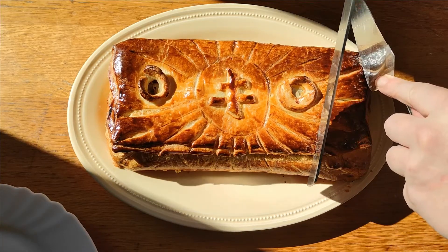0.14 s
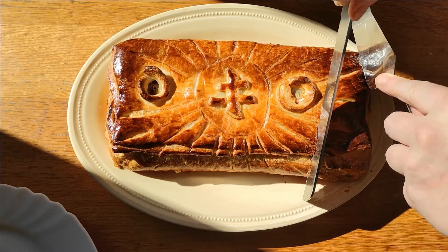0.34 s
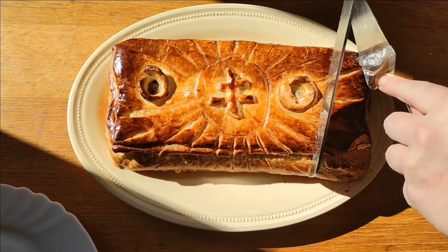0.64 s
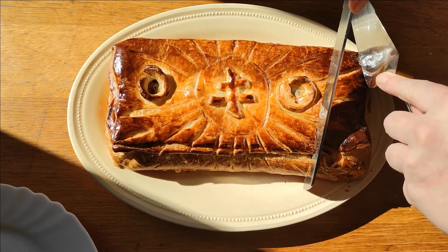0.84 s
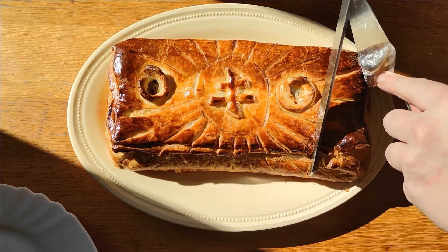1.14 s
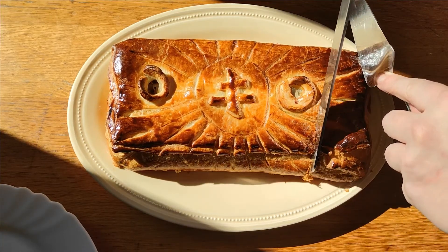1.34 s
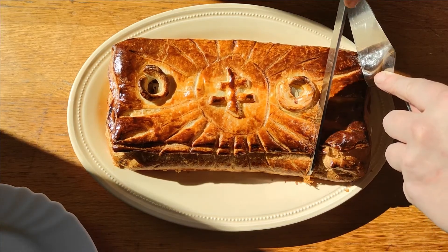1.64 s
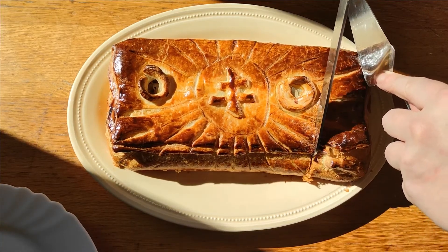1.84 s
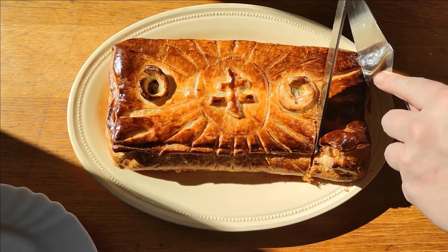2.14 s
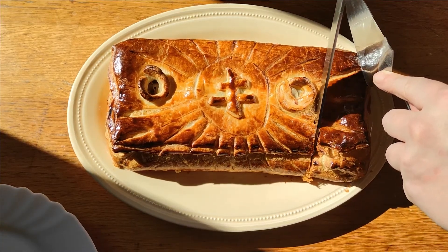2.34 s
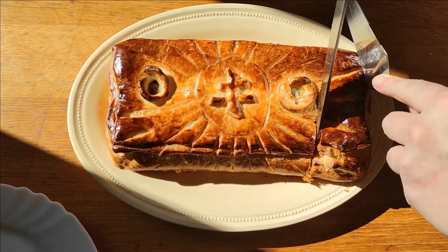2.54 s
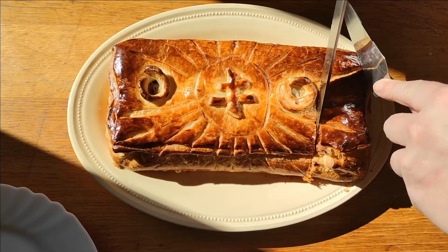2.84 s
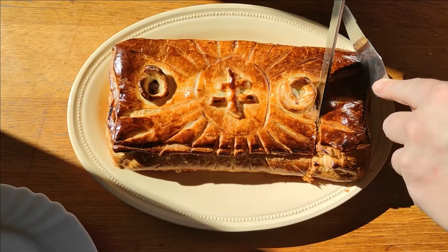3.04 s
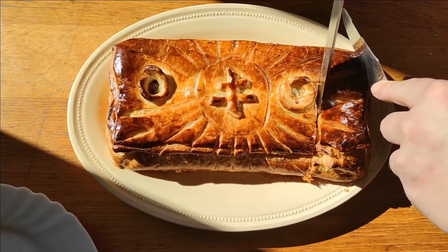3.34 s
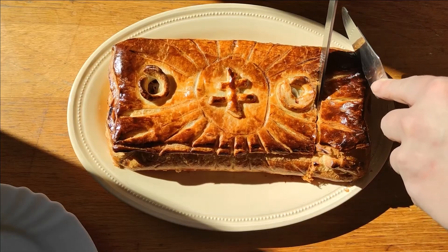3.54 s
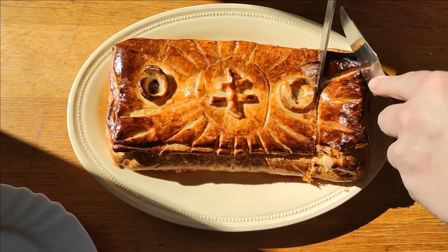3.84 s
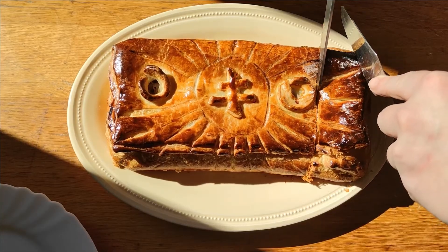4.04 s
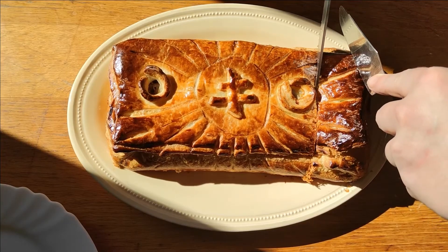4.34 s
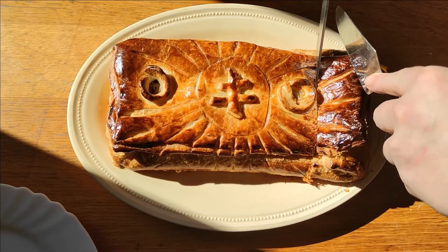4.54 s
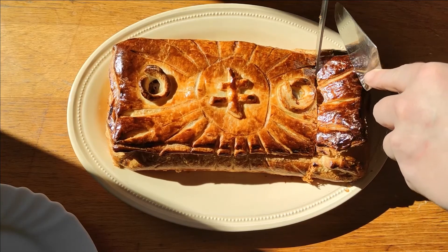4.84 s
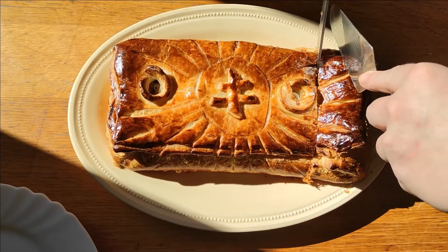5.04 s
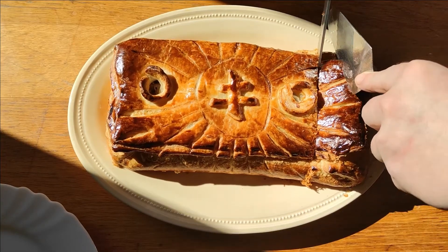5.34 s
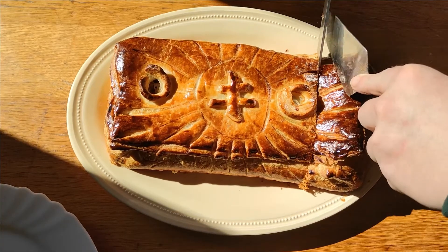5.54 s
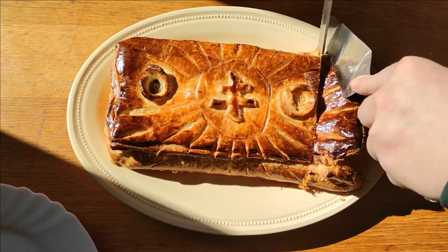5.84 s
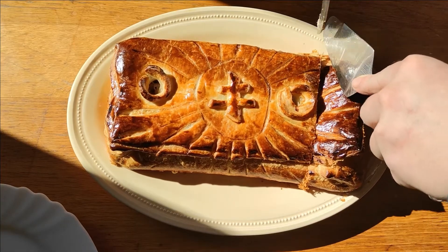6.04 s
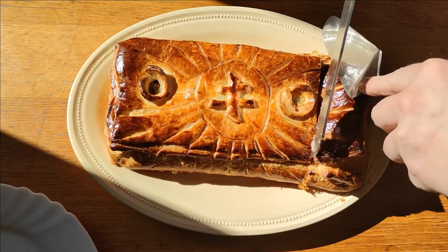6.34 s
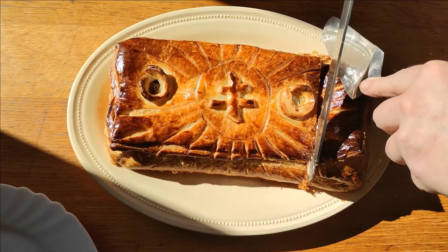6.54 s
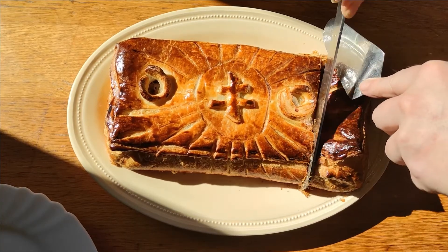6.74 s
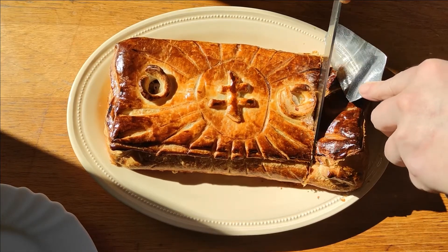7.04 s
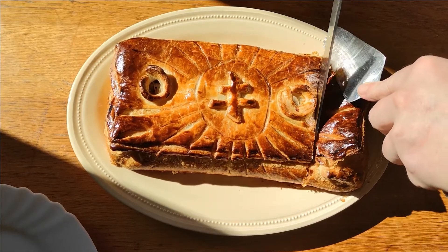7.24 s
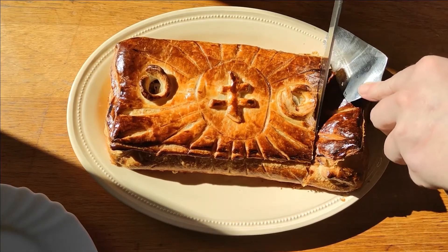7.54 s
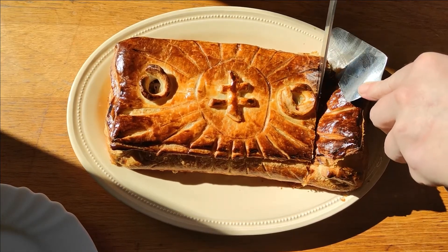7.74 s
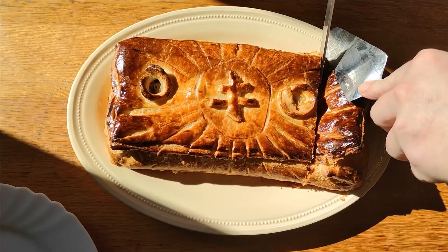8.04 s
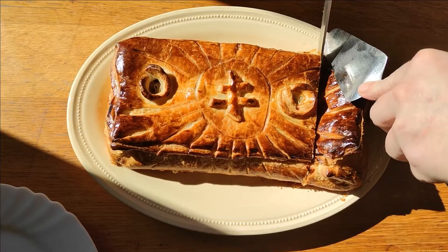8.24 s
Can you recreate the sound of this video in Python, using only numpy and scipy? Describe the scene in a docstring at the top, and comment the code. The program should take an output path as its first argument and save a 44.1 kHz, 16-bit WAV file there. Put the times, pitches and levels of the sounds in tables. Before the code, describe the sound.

Close, dry crackling of baked crust being cut stroke by stroke, flakes snapping, blade thudding on a ceramic plate, a metal server clinking once.

```python
"""Knife through crisp pastry

A knife saws through a crisp pastry on a ceramic platter, close by in a small kitchen.
The crust is shaped noise: each stroke swells to a crunchy bite, gives way and slides on; big flakes snap.
Dull bumps of the platter are short noise bursts; blade knocks are noise cracks plus fading platter tones.
A steel cake server clinks once against the knife (fading tones) and scrapes under the pastry (clumpy noise).
"""
import sys
import numpy as np
from scipy import signal
from scipy.fft import rfft, irfft, next_fast_len
from scipy.io import wavfile
from scipy.ndimage import uniform_filter1d

SR = 44100
rng = np.random.default_rng(int(sys.argv[2]) if len(sys.argv) > 2 else 0)


def waveform_to_disk(signal):
    """Save audio, clipped to [-1, 1], as 16-bit WAV at the path in sys.argv[1]."""
    frames = np.transpose(np.atleast_2d(signal))
    scaled = np.clip(frames, -1, 1) * 32767
    samples = np.round(scaled).astype(np.int16)
    wavfile.write(sys.argv[1], SR, samples)


N = 369822

# how alike the two microphones hear each pitch: [f/Hz, correlation]
LIKENESS = [(30, .35), (100, .8), (300, .92), (700, .85), (1300, .15), (2500, -.1), (5000, -.2),
            (14000, .1)]
# tone of the crackling crust: [f/Hz, relative level/dB]
CRISP_TONE = [(900, -15.5), (2000, -6.5), (3000, -1), (4500, 1), (5500, 0.5), (6800, 2.5), (7500, -1),
              (8400, -12), (10000, -10.5), (14000, -11)]
# tone of the tearing softer layers: [f/Hz, relative level/dB]
TEAR_TONE = [(300, -13.5), (600, -6.5), (1000, -1.5), (1700, -2), (2400, -3), (4000, -7.5), (8000, -39)]
# tone of the platter pushed on the table: [f/Hz, relative level/dB]
PUSH_TONE = [(30, -10), (80, -5.5), (160, -6), (232, -15), (268, 5), (300, -1), (365, -6), (412, -2),
             (520, -12), (800, -23), (1600, -39.5)]


def amp(db):
    """Turns decibels into a gain."""
    return 10 ** (np.asarray(db) / 20)


def unit(x):
    """Scales a sound to an average strength (rms) of one."""
    return x / np.sqrt(np.mean(x ** 2) + 1e-20)


def read(points, hz):
    """Reads a curve between its points, along a log-frequency axis."""
    f, value = np.transpose(points)
    return np.interp(np.log(hz + 1), np.log(f + 1), value)


def follow(rows, index):
    """Turns one dB column of a timed curve into a gain for every sample."""
    rows = np.array(rows)
    return amp(np.interp(np.arange(N) / SR, rows[:, 0], rows[:, index]))


def add(mix, s, sound):
    """Adds a sound of several channels into the mix at a time in seconds."""
    start = max(round(s * SR), 0)
    part = mix[:, start:][:, :sound.shape[1]]
    part += sound[:, :part.shape[1]]


def colour(pair, spectrum):
    """Gives two signals a spectrum, and makes them as alike as two close microphones hear them."""
    size = next_fast_len(pair.shape[1], True)
    hz = np.fft.rfftfreq(size, 1 / SR)
    z = rfft(pair, size)
    same = np.clip(read(LIKENESS, hz), -1, 1)
    mid = z[0] * np.sqrt(1 + same)
    side = z[1] * np.sqrt(1 - same)
    shaped = np.array([mid + side, mid - side]) * amp(read(spectrum, hz))
    return unit(irfft(shaped, size)[:, :pair.shape[1]])


def grains(per_s, spread_db, haze, clump_db):
    """Tiny uneven fractures over a finer haze, in clumps as the surfaces stick and slip."""
    size_db = spread_db * np.minimum(rng.exponential(1, N), 4)  # sizes have a ceiling
    size = amp(size_db) * (rng.random(N) < per_s / SR)
    burst = signal.lfilter([1], [1, -np.exp(-1 / 10)], size ** 2)  # power of each grain dies over 10 samples
    slow = uniform_filter1d(rng.standard_normal(N), size=450)
    slip = unit(uniform_filter1d(slow, size=120))
    strength = np.sqrt(burst / burst.mean() + haze ** 2)
    return strength * amp(clump_db * slip) * rng.standard_normal((2, N))


def bursts(rows, spectrum, decay_s, level_db):
    """Short breaks that do not ring: coloured noise that dies away."""
    out = np.zeros((2, N))
    t = np.arange(SR // 8) / SR
    for s, db in rows:
        noise = colour(rng.standard_normal((2, len(t))), spectrum)
        add(out, s, amp(db + level_db) * noise * np.exp(-t / decay_s))
    return out


def ring(hz, gain, t60, pan_db, t, scatter=0.77):
    """Fading tones (modes) of a struck body, each phase about a quarter turn from the one before."""
    # where the microphones hear differently, left and right are out of step
    apart = np.arccos(np.clip(read(LIKENESS, hz), -1, 1)) / 2
    phase = np.arange(len(hz)) * np.pi / 2 + scatter * rng.standard_normal(len(hz))
    phase = phase + np.array([-apart, apart])
    fade = amp(-60 * np.maximum(t, 0) / t60[:, None])
    waves = np.sin(2 * np.pi * hz[:, None] * t + phase[..., None]) * fade
    side_gain = gain * amp(np.array([pan_db, -pan_db]) / 2)
    return (waves * side_gain[..., None]).sum(1)


def air():
    """The still air of the room: a steady, faint noise."""
    # [f/Hz, relative level/dB]
    air_tone = [(12, -23), (20, 6.5), (223, -8.5), (263, -20.5), (409, -10.5), (470, -20.5), (693, -17.5),
                (1140, -22.5), (1930, -21), (5090, -23.5), (6720, -25.5), (9110, -34), (13800, -30),
                (15000, -46)]
    return amp(-54.5) * colour(rng.standard_normal((2, N)), air_tone)


def sawing():
    """Crackle, tear and push gains: a stroke swells to a bite, holds, falls; its slide stops at each turn."""
    # sawing strokes, each lasting until the next: [start t/s, time to bite t/s, crisp crust level/dB,
    # tearing of softer layers level/dB, sliding level/dB, lean on the platter level/dB]
    strokes = [(0, 0.034, -42, -46, -52, 0), (.205, 0.14, -36, -40.5, -44.5, 1.5),
               (.7, 0.13, -35, -37, -66, 2), (.97, 0.041, -50, -56, -50, 1.5),
               (1.12, 0.096, -36, -36, -74, 0), (1.38, 0.038, -54, -56, -55.5, -5),
               (1.527, 0.11, -36, -32.5, -68, 2), (1.931, 0.069, -43, -38.5, -62, 3),
               (2.289, 0.051, -47, -49, -59, -0.5), (2.49, 0.093, -53, -66, -60, -0.5),
               (2.68, 0.045, -49, -55, -54.5, 1), (2.815, 0.16, -55, -45, -53.5, -1.5),
               (3.034, 0.084, -42, -38, -55.5, 1), (3.413, 0.07, -33.5, -39, -46.5, -3),
               (3.771, 0.089, -31.5, -37.5, -63.5, -1), (4.182, 0.026, -30.5, -57, -53, -2),
               (4.525, .05, -44, -46, -51.5, 0.5), (4.854, 0.038, -44, -49.5, -53.5, 1),
               (5.185, 0.034, -43.5, -53, -51.5, 1.5), (5.375, 0.037, -36.5, -49, -59, -3.5),
               (5.5, 0.023, -45.5, -45.5, -61, 1), (5.698, 0.41, -55, -46, -56.5, 3),
               (6.07, .03, -58.5, -57.5, -81, -2.5), (6.425, 0.019, -54.5, -58, -75, -4),
               (6.516, 0.089, -47.5, -64, -51, -5), (6.875, 0.047, -50.5, -47, -72, 1.5),
               (7.12, 0.069, -50.5, -53.5, -56, 0), (7.29, 0.067, -53, -45, -58.5, 3),
               (7.57, 0.15, -41.5, -40, -64, 5.5), (7.97, 0.033, -40.5, -54, -58, -0.5),
               (8.18, 0.023, -52.5, -55, -57.5, 7.5)]
    swell_rise_db, hold_s = 19.5, 0.009  # growth up to the bite; then a hold before the crust gives way
    crisp_fall_db_per_s, tear_fall_db_per_s = 170.5, 159.5
    speed_power, slide_tear_db = 0.44, -2  # sliding follows blade speed; tearing in the slide
    push_power = 0.61  # drag on the platter grows more slowly than the crunch
    power = np.zeros((3, N))
    t = np.arange(SR) / SR
    ends = [row[0] for row in strokes[1:]] + [N / SR]
    for (start, bite_s, crisp_db, tear_db, slide_db, lean_db), end in zip(strokes, ends):
        swell_db = swell_rise_db * np.minimum(t / bite_s - 1, 0)
        after = np.maximum(t - bite_s - hold_s, 0)
        speed = np.abs(np.sin(np.pi * np.minimum(t / (end - start), 1)))
        slide = amp(slide_db) * speed ** speed_power
        crisp_bite = amp(crisp_db + swell_db - crisp_fall_db_per_s * after)
        tear_bite = amp(tear_db + swell_db - tear_fall_db_per_s * after)
        crisp = np.hypot(crisp_bite, slide)
        tear = np.hypot(tear_bite, amp(slide_tear_db) * slide)
        push = amp(lean_db) * np.hypot(crisp, tear) ** push_power
        add(power, start, np.array([crisp, tear, push]) ** 2)
    return np.sqrt(power)


def crust(crisp_db=-1.0, flakes_db=-9, tear_db=-4.0, push_db=-22.5, pan_db=-0.9):
    """Flakes crackle, the layers under them tear, and the drag of the blade rumbles in the platter."""
    crackling, tearing, pushing = sawing()
    flakes = amp(flakes_db) * unit(grains(per_s=53, spread_db=3, haze=0, clump_db=1.5))
    fine = unit(grains(per_s=1500, spread_db=0.0, haze=1.0, clump_db=2.5))
    crisp = amp(crisp_db) * crackling * colour(fine + flakes, CRISP_TONE)
    layers = grains(per_s=500, spread_db=2.0, haze=0.98, clump_db=3.5)
    tear = amp(tear_db) * tearing * colour(layers, TEAR_TONE)
    drag = grains(per_s=270, spread_db=0.5, haze=.7, clump_db=0.9)
    push = amp(push_db) * pushing * colour(drag, PUSH_TONE)
    return (crisp + tear) * amp([[pan_db], [-pan_db]]) + push


def snaps():
    """Large flakes snap: a sharp crack, a duller tear, and crumbs that crumble on briefly."""
    # [t/s, level before the part levels below/dB]
    flake_snaps = [(0.2106, -41), (0.7914, -19.5), (1.035, -27.5), (1.2128, -21), (1.6107, -21),
                   (1.9899, -18.5), (3.1278, -24.5), (3.8142, -19), (3.8319, -17), (3.86, -21.5),
                   (5.0266, -26.5), (5.0904, -29.5), (5.3026, -28.5), (5.4114, -23), (7.6343, -29),
                   (8.0037, -25), (8.2136, -31)]
    sharp = bursts(flake_snaps, CRISP_TONE, decay_s=0.0014, level_db=-8.5)
    dull = bursts(flake_snaps, TEAR_TONE, decay_s=.006, level_db=-17.5)
    crumbs = bursts(flake_snaps, CRISP_TONE, decay_s=.016, level_db=-13.0)
    return sharp + dull + crumbs


def bumps():
    """Soft bumps of the platter on the table: short, low noise bursts."""
    # [t/s, level before the offset below/dB]
    platter_bumps = [(.305, -25.5), (2.385, -36), (2.89, -25), (2.923, -44), (5.218, -23), (6.443, -36.5),
                     (7.212, -31)]
    return bursts(platter_bumps, PUSH_TONE, decay_s=0.03, level_db=-10.0)


def blow(hz, hardness_db, body_hz, rim_hz):
    """Strength of a knock in dB by frequency: harder is brighter, and the spot struck favours some modes."""
    # what every knock puts in: [f/Hz, relative level/dB]
    blow_tone = [(150, -11), (270, -4), (400, -3.5), (730, -4), (1290, -5), (1750, -2.5), (3000, -3),
                 (4200, -12), (6000, -17)]
    favour_db, favour_octaves = 7.5, 0.56  # boost and width around each favoured resonance
    favour = sum(np.exp(-(np.log2(hz / centre) / favour_octaves) ** 2 / 2) for centre in (body_hz, rim_hz))
    return read(blow_tone, hz) + hardness_db * np.log2(hz / 1000) + favour_db * favour


def knocks(contact_s=.0036, rise_s=0.0019, modes_db=-5.0, bite=1.47, bite_s=0.0023,
           crack_db=-18, crack_s=0.0036):
    """The blade breaks through and strikes the platter; where it lands decides which modes answer."""
    # the blade meets the platter: [t/s, strength level/dB, place from 0 (near rim) to 1 (far rim),
    # hardness/(dB per octave), favoured body resonance f/Hz, favoured rim resonance f/Hz]
    platter_knocks = [(0.38, -17, 0, -1.1, 360, 3050), (0.831, -17, 0.06, -3, 377, 4600),
                      (1.639, -16, 0.29, -0.7, 574, 2360), (2.022, -16, 0.36, 0.1, 690, 1970),
                      (3.907, -19.5, 0.95, 3.5, 390, 1360), (4.279, -21.5, 1, 2, 390, 1950),
                      (4.612, -19.5, 0.98, 2.6, 364, 1420), (4.939, -19.0, 0.93, 3.5, 365, 1820),
                      (5.245, -21, 0.83, 1.26, 687, 1095), (6.059, -16, 0.19, 3, 300, 2280),
                      (6.795, -27, 0, -3, 414, 4370), (7.396, -35, 0.32, 0.7, 260, 4090),
                      (7.723, -28.5, 0.41, 1.5, 450, 1270), (7.772, -36, 0.93, -1, 460, 1370),
                      (7.824, -40, 0.5, 3.5, 860, 1500), (8.272, -38.5, 0.62, -2, 430, 1760)]
    # tones of the laden platter on its wooden table: [f/Hz, relative level struck at near rim/dB,
    # relative level struck at far rim/dB, time to fall 60 dB t/s, left over right level/dB]
    platter = [(158, -16.5, -4.5, 0.054, -11.5), (268.5, -1.5, 3, 0.24, 0), (333.6, -3.5, 0.5, 0.15, 3),
               (418, -9, -6, 0.2, 6.5), (426, 0.5, -12, 0.033, -4), (520.7, -1, -9.5, 0.14, -6.5),
               (587, 1.5, 5, 0.024, -4.5), (698, 0, 1.5, 0.03, -1), (792, 3, -8, .05, -8),
               (1030, 0, -19.5, 0.027, 3), (1261, 2.5, -1.5, 0.032, -3.5), (1332, -5.5, 6.5, 0.025, 0),
               (1600, -18, -6.5, 0.025, -13.5), (1665, 1.5, 1, 0.055, -7), (1752, 2.5, 5.5, 0.014, -5),
               (1890, -0.5, -1.5, 0.024, 0.5), (2217, -4, -13, 0.043, -7), (2888, -4, -0.5, 0.082, -1.5),
               (2942, -9, 3, 0.083, 1.5), (3030, -11, 0.5, 0.035, -5), (3450, -13, -7.5, 0.084, -10.5),
               (3710, -0.5, -9.5, 0.075, 2), (4250, -3.5, 1.5, 0.017, -2), (4465, -0.5, -5, .04, -1.5),
               (5560, -5, -12.5, .03, 2), (5665, 2.5, -3.5, 0.061, -6), (6680, -7, -7.5, 0.034, 1.5),
               (7050, -0.5, -7, 0.033, -6)]
    # the contact itself, before the colour of the blow: [f/Hz, relative level/dB]
    crack_tone = [(150, -19), (400, 10), (1000, -14), (2000, -14), (4000, -1), (7000, -0.5), (9000, -16.5),
                  (15000, -21.5)]
    out = np.zeros((2, N))
    t = np.arange(SR // 4) / SR - contact_s  # zero when the blade lands fully
    hz, near_db, far_db, t60, pan_db = np.transpose(platter)
    # pastry cushions the blow
    press = np.exp(-(np.minimum(t, 0) / rise_s) ** 2 / 2)
    press = press * np.clip((t + contact_s) / rise_s - .5, 0, 1)
    # loudest while the blade still drives the platter
    press = press * (1 + bite * np.exp(-(t / bite_s) ** 2 / 2))
    for s, strength_db, place, *touch in platter_knocks:
        far = np.clip(place, 0, 1)
        mode_db = (1 - far) * near_db + far * far_db + blow(hz, *touch) + modes_db
        modes = ring(hz, amp(mode_db), t60, pan_db, t)
        spectrum = [(f, db + blow(f, *touch)) for f, db in crack_tone]
        crack = colour(rng.standard_normal((2, len(t))), spectrum)
        crack *= amp(crack_db) * np.exp(-np.maximum(t, 0) / crack_s)
        add(out, s, amp(strength_db) * press * (modes + crack))
    return out


def clink(rise_s=0.00087, chatter=0.49):
    """Steel on steel: the server's tones ring on, chattering a little against the blade."""
    # the one clink: [t/s, level added to every tone/dB]
    start_s, level_db = (6.0605, -22)
    # tones of the cake server: [f/Hz, relative level/dB, time to fall 60 dB t/s]
    steel = [(938, -6.5, 0.17), (1455, -6.5, 0.21), (1626, -6, 0.21), (1870, -9.5, .22), (2100, -0.5, 0.32),
             (2790, -8.5, 0.18), (3182, -7.5, 0.18), (3400, 1, 0.12), (3580, 3, 0.31), (4097, -7, .18),
             (4640, -9, 0.3), (5475, -10, 0.25), (5510, -12, 0.24), (6440, -12, 0.28), (7000, -20.5, .21),
             (7693, -23, .27), (8820, -18.5, 0.2), (10200, -25.5, 0.19), (11400, -27, 0.15)]
    out = np.zeros((2, N))
    t = np.arange(SR // 2) / SR
    hz, db, t60 = np.transpose(steel)
    wobble = unit(uniform_filter1d(rng.standard_normal((2, len(t))), size=250))
    rattle = 1 + chatter * wobble
    tones = ring(hz, amp(db + level_db), t60, 0 * hz, t)
    add(out, start_s, tones * rattle * (1 - np.exp(-t / rise_s)))
    return out


def scrape(level_db=-2):
    """Steel sticks and slips on the glaze and stirs the platter's resonances: clumpy, coloured noise."""
    # the server slides, a light rub and a firm one: [t/s, level before level_db/dB]
    slide = [(7.22, -93.5), (7.3, -55), (7.37, -53), (7.46, -47), (7.53, -62), (7.68, -47.5), (7.84, -35.5),
             (7.9, -42), (7.99, -41), (8.04, -88)]
    # tone of the glaze: [f/Hz, relative level/dB]
    glaze_tone = [(400, -12), (570, -1), (800, -21), (1000, -27.5), (1350, 3), (1650, 5.5), (2000, -5.5),
                  (2500, -12), (3000, 3.5), (3700, -17), (8000, -36)]
    rub = grains(per_s=250, spread_db=2.5, haze=.3, clump_db=1.5)
    return amp(level_db) * follow(slide, index=1) * colour(rub, glaze_tone)


def kitchen(x, gap_s=0.0019):
    """Dense reflections from near walls: a noise tail whose bands each die at their own speed."""
    # time for the echoes to fall 60 dB: [f/Hz, t/s]
    room_t60 = [(100, 0.2), (300, 0.14), (800, 0.3), (1800, 0.32), (3500, 0.33), (7000, 0.058),
                (14000, .15)]
    # strength of the echoes: [f/Hz, relative level/dB]
    room_wet = [(100, -1), (160, -4), (220, -15.5), (300, -10.5), (550, -4), (1000, -11), (1800, -6.5),
                (3000, -7), (7000, -6), (12000, -20)]
    taps = colour(rng.standard_normal((2, SR // 2)), [(1, 0), (SR, 0)])
    hz, t, z = signal.stft(taps, SR, nperseg=256)
    t60 = read(room_t60, hz)[:, None]
    fade = np.exp(-np.log(1000) * t / t60)
    even = np.sqrt(2 * np.log(1000) / (t60 * SR))  # long and short tails get equal energy
    z = z * fade * even * amp(read(room_wet, hz))[:, None]
    tail = signal.istft(z, SR, nperseg=256)[1]
    tail *= np.clip(np.arange(tail.shape[1]) / SR / gap_s - 1, 0, 1)  # silent gap, then a quick rise
    return signal.fftconvolve(x, tail, axes=1)[:, :N]


def scene():
    """Everything on the table, its reflections, and the still air of the room."""
    table = crust() + snaps() + bumps() + knocks() + clink() + scrape()
    return table + kitchen(table) + air()


def record(dry):
    """The recorder clips whatever goes beyond full scale, then cuts the highest treble."""
    clipped = np.clip(dry, -1, 1)
    low_pass = signal.firwin(255, 14400, window=("kaiser", 8), fs=SR)  # edge in Hz
    return signal.oaconvolve(clipped, low_pass[None], "same")


dry = scene()
out = record(dry)
waveform_to_disk(out)
```